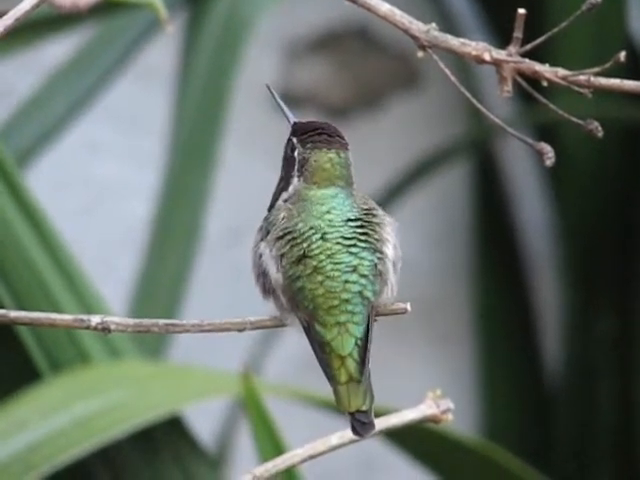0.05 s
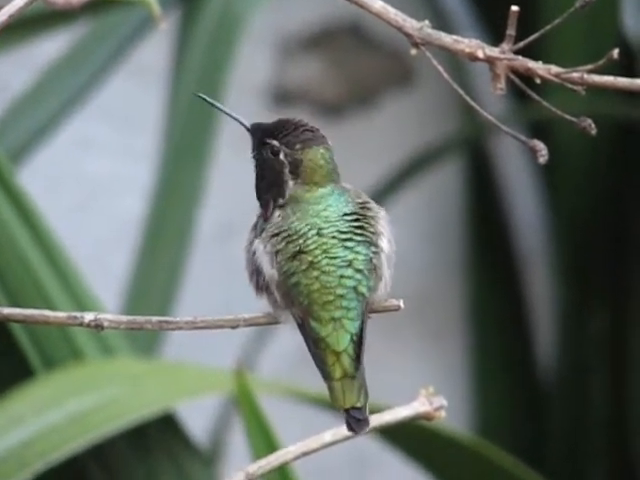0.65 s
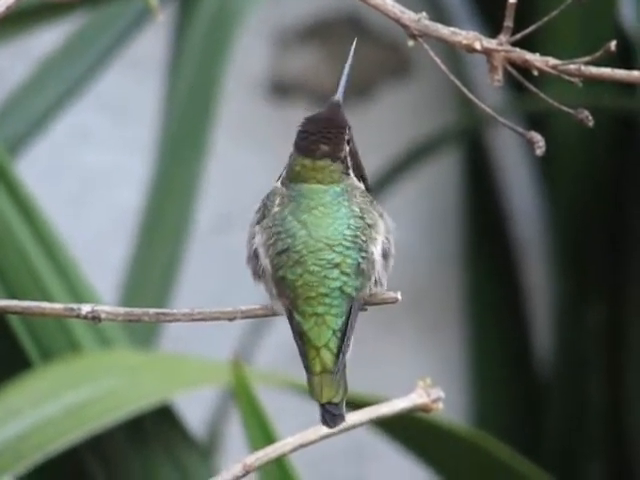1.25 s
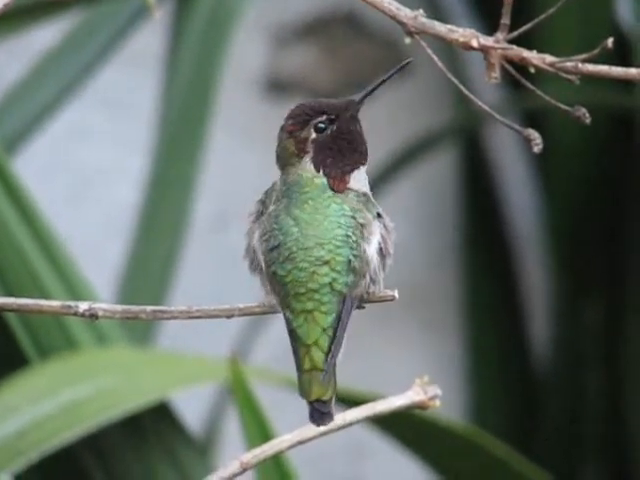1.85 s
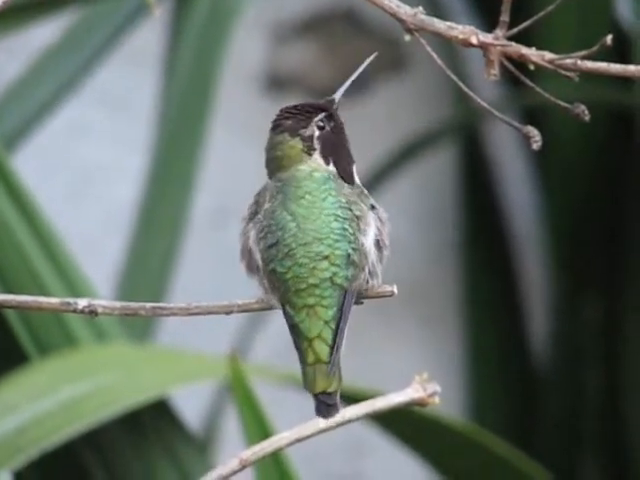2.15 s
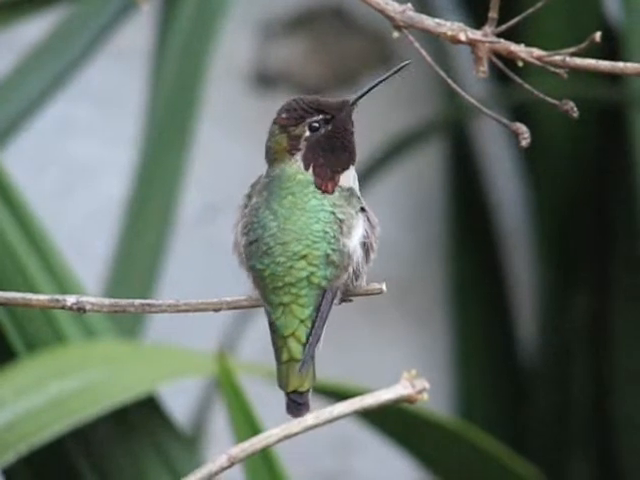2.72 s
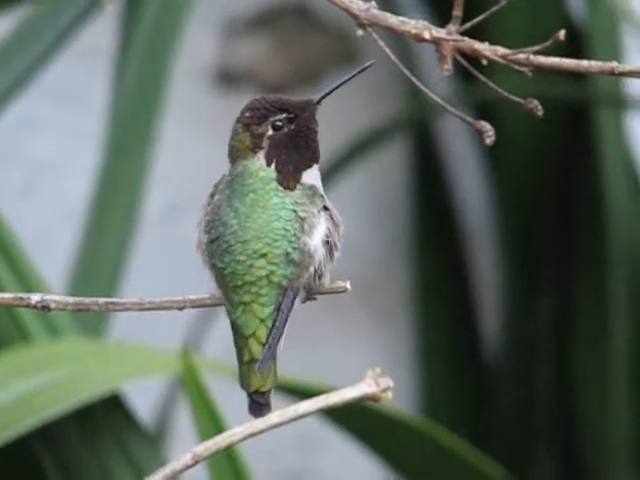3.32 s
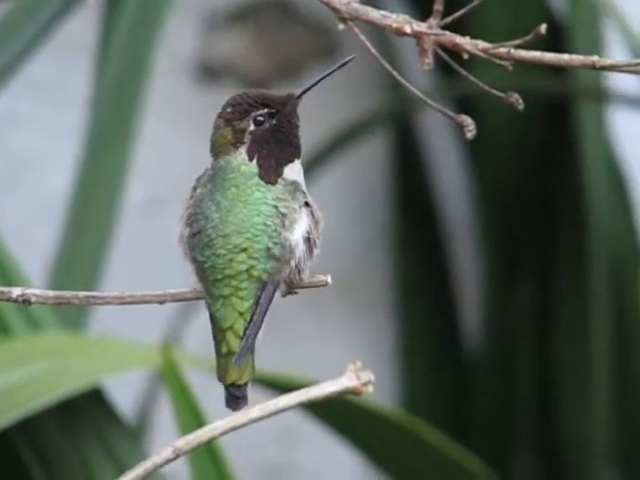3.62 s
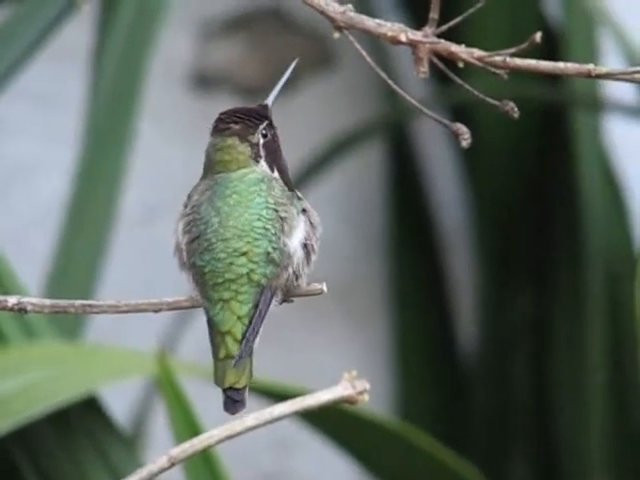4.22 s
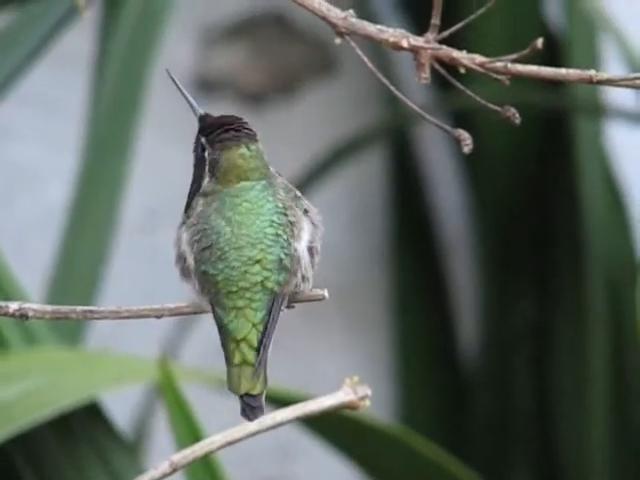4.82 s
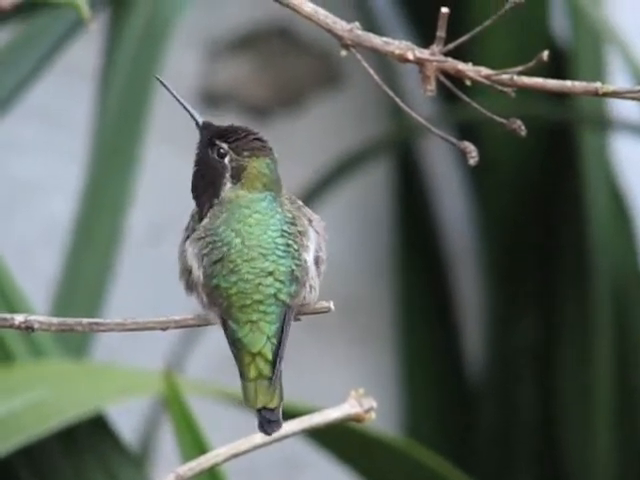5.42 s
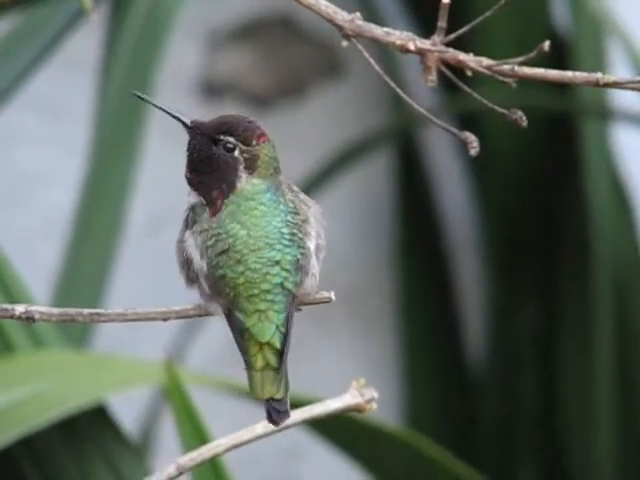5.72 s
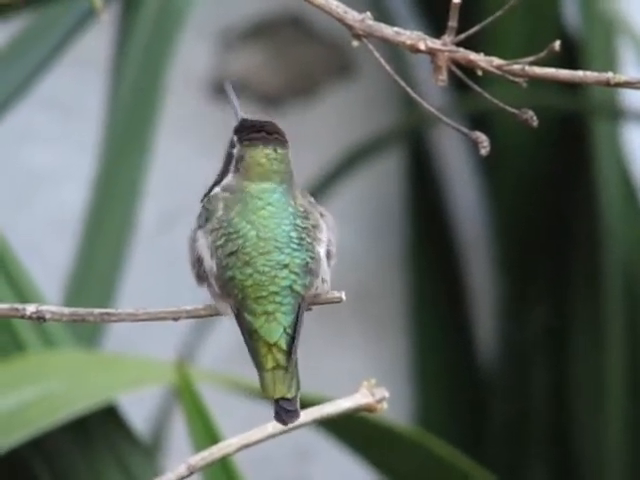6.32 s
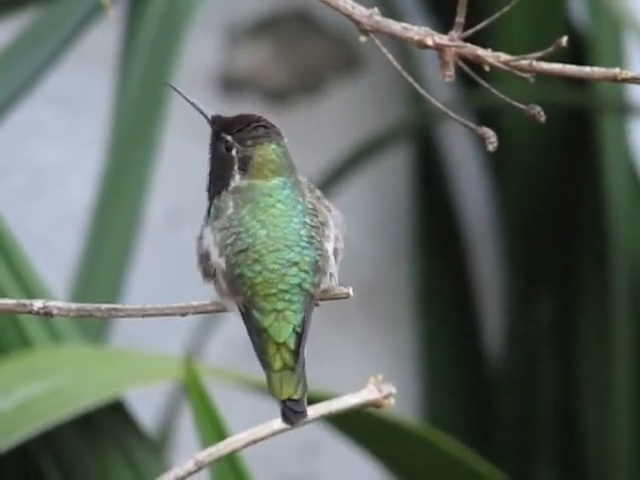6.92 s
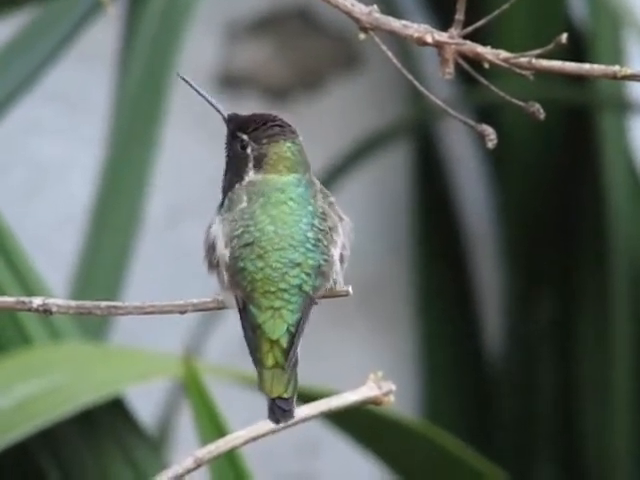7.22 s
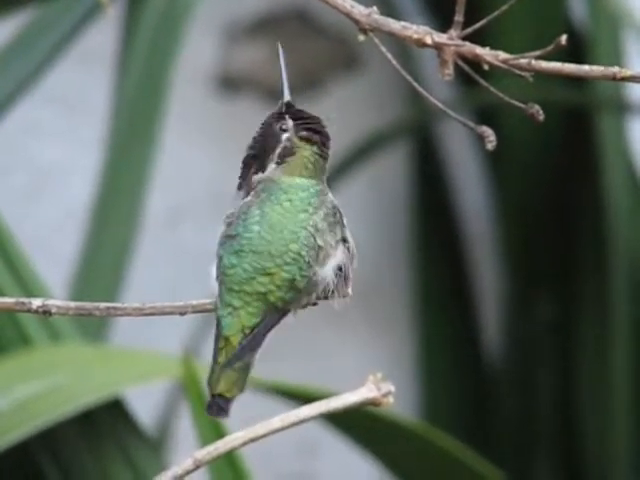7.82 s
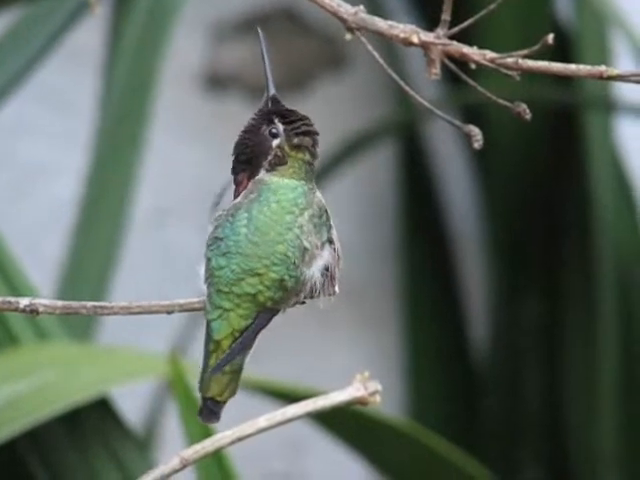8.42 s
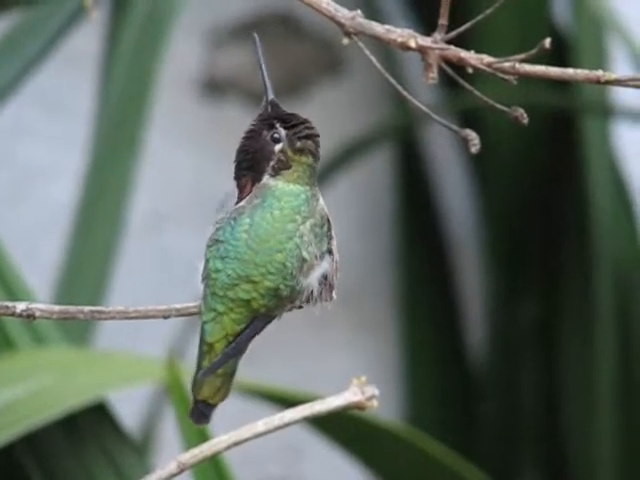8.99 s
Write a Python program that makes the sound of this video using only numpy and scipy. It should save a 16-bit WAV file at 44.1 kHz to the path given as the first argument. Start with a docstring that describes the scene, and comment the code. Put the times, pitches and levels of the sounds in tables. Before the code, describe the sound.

A hummingbird perched in a garden sings a quick run of very high, scratchy chips, about four or five a second, unevenly spaced and sometimes in tight pairs. Each chip drops sharply in pitch and leaves a brief echo from nearby walls and leaves. Behind it are a steady low machine hum, distant town rumble and a faint high whine. The bird, clear and fairly close, stops near the end while the background continues.

```python
"""Hummingbird in a garden

A hummingbird sings a run of high chips, each a thin held whistle whose frequency dives about an
octave in a few milliseconds. Reflection from nearby walls and leaves gives every dive a scratchy
tail. Behind it lie the broadband rumble of a distant town, a machine's low hum and a faint high
whine. A limiter acts on the sum, so loud chips briefly duck the background."""
import sys
import numpy as np
from scipy import signal
from scipy.fft import rfft, irfft
from scipy.io import wavfile
from scipy.ndimage import uniform_filter1d

SR = 44100
rng = np.random.default_rng(int(sys.argv[2]) if len(sys.argv) > 2 else 0)


def master(y):
    """Save y as 16-bit WAV."""
    cut = np.clip(np.atleast_2d(y).T, -1, 1)
    pcm = np.round(cut * 32767)  # scale
    wavfile.write(sys.argv[1], SR, pcm.astype(np.int16))


N = 403515
TIME = np.arange(N) / SR
SONG_TIME = np.arange(-SR // 4, N) / SR   # the song is already under way at time zero
BIN_HZ = np.maximum(np.arange(N // 2 + 1) * SR / N, 1)


def from_db(db):
    """Amplitude ratio: a factor of ten for every 20 dB."""
    return 10 ** (np.asarray(db) / 20)


def gain_at(spectrum, hz):
    """Frequency response: levels interpolated on a log-frequency axis, returned as gain."""
    frequency_hz, level_db = np.transpose(spectrum)
    return from_db(np.interp(np.log(hz), np.log(frequency_hz), level_db))


def colour(x, spectrum):
    """Linear filtering: the sound's spectrum is multiplied by a frequency response."""
    size = x.shape[-1]
    hz = np.maximum(np.arange(size // 2 + 1) * SR / size, 1)
    return irfft(rfft(x) * gain_at(spectrum, hz), size)


# Strength of the fundamental along its dive: pitch_hz, gain_db
FUNDAMENTAL = [(3600, -15), (4300, -12), (5000, -12), (5800, -1.5), (7000, -0.5), (8200, -5.5), (9500, -3),
               (10500, -1.5)]
# Strength of the second harmonic: harmonic_hz, gain_db
SECOND_HARMONIC = [(7500, -27), (9500, -15), (11500, -12), (14000, -27.5), (16000, -59), (20000, -62)]
# Faint high hiss that accompanies each whistle, relative to it: frequency_hz, gain_db
WHISTLE_HISS = [(4000, -33), (7000, -24), (10500, -16), (12000, -23.5), (15000, -39.5)]
# One chip quavers on its way down and stops higher: time_s, depth_hz, rate_hz, lowest_hz
QUAVER = (6.091, 600, 300, 5100)
DIVE_HZ, DIVE_HZ_PER_S = 7000, 740000


def chip(t, top_hz, hold_s, hold_db, treble_db, quavers, curve=2.2, scoop_hz=300, jitter_hz=70,
         lowest_hz=4320, fade_hz=450, attack_s=0.0048, swell_db=5, peak_lead_s=0.0026):
    """Frequency modulation: a whistle scoops up, holds, then dives through DIVE_HZ at t = 0."""
    bend_s = curve * (top_hz - DIVE_HZ) / DIVE_HZ_PER_S   # a higher chip takes longer to bend over
    lead_s = hold_s + bend_s
    descent = np.clip(1 + t / bend_s, 0, 1) ** curve + curve * np.maximum(t, 0) / bend_s
    scoop = np.clip((-t - bend_s) / bend_s, 0, 1) ** 2
    jitter = uniform_filter1d(rng.standard_normal(len(t)), size=50)
    hz = top_hz - (top_hz - DIVE_HZ) * descent - scoop_hz * scoop + jitter_hz * jitter / np.std(jitter)
    if quavers:
        _, depth_hz, rate_hz, lowest_hz = QUAVER
        # the wobble is strongest in mid-dive, and the fall after it is slower
        wobble = -np.sin(np.pi / 2 * np.minimum(descent, 2)) ** .5 * np.cos(2 * np.pi * rate_hz * t)
        hz = hz + depth_hz * (wobble + np.maximum(descent - 1, 0))
    hz = np.maximum(hz, lowest_hz - fade_hz)
    onset = np.clip((t + lead_s) / attack_s, 0, 1)
    fade = np.clip((hz - lowest_hz + fade_hz) / (2 * fade_hz), 0, 1)
    # air pressure builds through the hold and is full in the dive
    to_peak = np.clip((-t - peak_lead_s) / max(lead_s - peak_lead_s, .001), 0, 1)
    pressure = onset * fade * from_db(hold_db * np.sqrt(to_peak) - swell_db * to_peak ** 2)
    phase = 2 * np.pi * np.cumsum(hz) / SR
    strength = gain_at(FUNDAMENTAL, hz)
    octave = gain_at(SECOND_HARMONIC, 2 * hz) * np.sin(2 * phase)
    hiss = strength * colour(rng.standard_normal(len(t)), WHISTLE_HISS)
    return np.sqrt(2) * pressure * (strength * np.sin(phase) + from_db(treble_db) * (octave + hiss))


# The chips of the song: mid_dive_s, held_pitch_hz, gain_db, hold_gain_db
CHIPS = [(-0.062, 8930, -14.5, -11), (0.261, 9210, -9, -7.5), (0.5086, 9400, -9.5, -8),
         (0.817, 9500, -8, -10.5), (1.2743, 10330, -9.5, -4.6), (1.3912, 9670, -9.5, -1),
         (1.63, 10110, -9, -4.1), (1.7224, 10000, -9, -4.5), (1.9003, 10180, -9.5, -7.5),
         (1.9806, 9800, -6.9, -10.5), (2.238, 9820, -8.5, -10), (2.3187, 9560, -7.8, -8),
         (2.5803, 9790, -9, -10.5), (2.675, 9390, -7.1, -6.5), (2.8762, 9550, -6.5, -8),
         (3.014, 9540, -6, -8.5), (3.1944, 9900, -7.5, -11.5), (3.458, 9600, -8.5, -7),
         (3.5753, 9540, -7.6, -5.5), (3.7996, 9730, -7, -10.5), (3.9574, 9590, -7, -7.5),
         (4.1985, 9600, -8, -5), (4.4374, 9600, -8, -5.5), (4.6341, 9630, -7, -7.5),
         (4.7814, 9480, -7.5, -6), (5.0237, 9400, -7, -4.8), (5.198, 9810, -9, -6),
         (5.4224, 9520, -9, -3.5), (5.632, 9750, -9.5, -3.5), (5.84, 9460, -8.6, -3.5),
         (6.0909, 9300, -8.5, -8), (6.322, 9960, -10, -6.5), (6.5582, 9630, -10, -4.5),
         (6.822, 9500, -9.5, -6.0), (7.0143, 9790, -8, -11), (7.265, 9530, -8, -9.5),
         (7.481, 9600, -9.0, -5.7), (7.7512, 9250, -9, -6)]
# Strength of second harmonic and hiss along the song: time_s, gain_db
TREBLE = [(0.3, 1), (1.6, -2), (2.5, 0), (3.3, 1), (4.8, -1.5), (7.7, 0)]
DIVE_TIMES_S = np.array(CHIPS)[:, 0]


def hummingbird(gain_db=0.35, single_hold_s=0.0065, pair_extra_s=0.002, pair_gap_s=0.16):
    """Superposition of chips into a song; those in a quick pair hold their pitch longer."""
    song = np.zeros(len(SONG_TIME))
    for dive_s, top_hz, chip_db, hold_db in CHIPS:
        span = slice(*np.searchsorted(SONG_TIME, [dive_s - .02, dive_s + .01]))
        quavers = abs(dive_s - QUAVER[0]) < .05
        paired = np.sum(abs(DIVE_TIMES_S - dive_s) < pair_gap_s) > 1
        hold_s = single_hold_s + pair_extra_s * paired
        treble_db = np.interp(dive_s, *np.transpose(TREBLE))
        whistle = chip(SONG_TIME[span] - dive_s, top_hz, hold_s, hold_db, treble_db, quavers)
        song[span] += from_db(chip_db + gain_db) * whistle
    return song


# Distinct reflections from nearby surfaces: delay_s, gain_db
REFLECTIONS = [(.0007, -9), (.0046, -6.5), (.0084, -25), (0.0144, -14), (0.0173, -11.5)]
# Spectrum of the scattered sound: frequency_hz, gain_db
SCATTER = [(4000, 3), (6000, 3.5), (8000, 3.5), (9600, 3.5), (11000, 3), (13000, 4.5), (15000, -4.5)]
# Filter on the left-right difference of all echoes: frequency_hz, gain_db
ECHO_SIDE = [(4000, -30), (6300, -5.5), (7300, -8), (8400, -28), (9600, -6.5), (11000, -19), (13000, -29)]


def garden_echoes(song, leaves_db=-6, leaves_t60_s=0.15, walls_db=-6.5, walls_t60_s=0.35,
                  gap_s=0.0012, absorption_hz=8400, absorption_db_per_s=45):
    """Multipath propagation: direct sound, reflections and diffuse decay, as mid and side."""
    t = TIME[:SR // 2]
    power = 0
    for level_db, t60_s in (leaves_db, leaves_t60_s), (walls_db, walls_t60_s):
        decay = from_db(-60 * t / t60_s) ** 2 * np.clip(t / gap_s - 1, 0, 1)
        power = power + from_db(level_db) ** 2 * decay / decay.sum()
    # the bird turns its head, so each chip takes one of five sets of paths
    chip_headings = rng.integers(0, 5, len(CHIPS) + 1)
    heading = chip_headings[np.searchsorted(DIVE_TIMES_S - .025, SONG_TIME)]
    lowpass = signal.butter(2, absorption_hz, fs=SR, output="sos")
    side_fade = np.minimum(2 - 2 * t / t[-1], 1)
    mid_side = np.zeros((2, N))
    for direction in np.unique(heading):
        scatter = colour(rng.standard_normal((2, len(t))), SCATTER)
        dull = signal.sosfiltfilt(lowpass, scatter)
        treble = (scatter - dull) * from_db(-absorption_db_per_s * t)   # air absorbs it along the way
        paths = np.sqrt(power) * (dull + treble)
        for delay_s, gain_db in REFLECTIONS:
            arrival = round(abs(delay_s + rng.normal(0, .0001)) * SR)
            paths[:, arrival] += from_db(gain_db) * np.array([1, rng.choice([-1, 1])])   # left or right
        paths[0, 0] += 1   # direct sound
        paths[1] = colour(paths[1], ECHO_SIDE) * side_fade
        heard = signal.oaconvolve([song * (heading == direction)], paths, axes=1)
        mid_side += heard[:, len(song) - N:len(song)]
    return mid_side


def port_resonance(x, centre_hz=6510, width_hz=3400, peak_gain=0.64):
    """Resonance between two microphone ports: two like second-order band-passes in cascade."""
    radius = np.exp(-np.pi * width_hz / SR)
    gain = (1 - radius ** 2) / 2
    section = [gain, 0, -gain, 1, -2 * radius * np.cos(2 * np.pi * centre_hz / SR), radius ** 2]
    return peak_gain * signal.sosfilt([section, section], x)


# Town noise common to both channels: frequency_hz, density_db
TOWN_MID = [(12, -64), (24, -52.5), (46, -48.5), (56, -64.5), (72, -54), (180, -56), (300, -62.5),
            (600, -68.5), (820, -74.5), (1100, -73.5), (1800, -78.5), (3200, -87), (5800, -87),
            (7500, -96.5), (12000, -102), (14000, -122)]
# Town noise differing between the channels: frequency_hz, density_db
TOWN_SIDE = [(20, -72), (150, -77.5), (400, -84), (1000, -83.5), (3000, -90), (6100, -92), (7500, -99),
             (11500, -105), (13500, -125)]
# Slow swells of the town: time_s, rumble_gain_db, rush_gain_db
TOWN_SWELLS = [(0.0, 0.8, 0.1), (0.7, 0.7, 0.1), (1.1, 0.5, 1.8), (1.45, -3, -1.3), (2.2, 0.3, -0.9),
               (3.1, -0.7, 1.3), (3.55, -0.5, 1.2), (3.9, 1, 1.9), (4.6, 1.5, 1.6), (5.25, 0.5, 0.8),
               (5.65, -1.5, -1.1), (6.6, -1.5, -2.2), (7.1, 0, -0.2), (8.1, 0.5, -1), (9.15, -1, -0.6)]


def town(split_hz=450):
    """Amplitude-modulated noise: far traffic's rumble and rush swell separately, as mid and side."""
    time_s, *gains_db = np.transpose(TOWN_SWELLS)
    rumble_gain, rush_gain = [from_db(np.interp(TIME, time_s, db)) for db in gains_db]
    white = rng.standard_normal((2, N)) * np.sqrt(SR / 2)   # unit power per hertz
    traffic = colour(white[0], TOWN_MID)
    rumble = irfft(rfft(traffic) / (1 + (BIN_HZ / split_hz) ** 4), N)
    mid = rumble * rumble_gain + (traffic - rumble) * rush_gain
    side = colour(white[1], TOWN_SIDE) * rush_gain
    return np.array([mid, side])


def wavering_tone(hz, width_hz):
    """Narrowband noise: a tone of unit rms whose amplitude and phase wander."""
    line = irfft(rfft(rng.standard_normal(N)) / (1 + ((BIN_HZ - hz) / width_hz) ** 2), N)
    return line / np.std(line)


# Spectral lines of the machine: pitch_hz, level_db, flutter_width_hz
HUM_LINES = [(119.4, -35, 6.4), (207.2, -49.5, 2.9), (249.2, -44, 4), (332.6, -48.5, 3.3),
             (437, -61.5, 2.7)]


def machine_hum(steady_share=0.7):
    """Line spectrum of a distant machine: each line's power is part steady tone, part flutter."""
    hum = 0
    for pitch_hz, level_db, width_hz in HUM_LINES:
        tone = np.sqrt(2 * steady_share) * np.sin(2 * np.pi * (pitch_hz * TIME + rng.random()))
        flutter = np.sqrt(1 - steady_share) * wavering_tone(pitch_hz, width_hz)
        hum = hum + from_db(level_db) * (tone + flutter)
    return hum


# Narrow bands of the high whine: centre_hz, level_db, width_hz
WHINE_BANDS = [(4510, -53, 48), (6035, -73, 20), (8000, -75, 15)]


def whine(side_db=-5):
    """Decorrelation: independent noise bands in mid and side give the whine no clear direction."""
    mid_side = np.zeros((2, N))
    for centre_hz, level_db, width_hz in WHINE_BANDS:
        mid_side[0] += from_db(level_db) * wavering_tone(centre_hz, width_hz)
        mid_side[1] += from_db(level_db + side_db) * wavering_tone(centre_hz, width_hz)
    return mid_side


def limiter(x, threshold_db=-5.0, attack_s=0.00028, release_s=0.064):
    """Peak limiting: excess level pulls the gain down fast, and the reduction decays exponentially."""
    peak_db = 20 * np.log10(np.abs(x).max(axis=0) + 1e-9)
    excess_db = np.maximum(peak_db - threshold_db, 1e-9)
    release = TIME / release_s
    held_db = np.exp(np.maximum.accumulate(np.log(excess_db) + release) - release)
    pole = np.exp(-1 / (attack_s * SR))
    reduction_db = signal.lfilter([1 - pole], [1, -pole], held_db)
    return x * from_db(-reduction_db)


def scene(pan_db=0.42):
    """Mid-side stereo of bird and background: left is their sum, right is mid minus side."""
    bird_mid, bird_side = garden_echoes(hummingbird())
    # the resonance lifts the left and hollows the right as each dive passes it
    bird_side = bird_side + port_resonance(bird_mid)
    back_mid, back_side = town() + whine()
    background = (back_mid + machine_hum()) * from_db([[pan_db], [-pan_db]])
    return bird_mid + background + (bird_side + back_side) * np.array([[1], [-1]])


def record(dry, cutoff_hz=15900):
    """Band limiting: a steep low-pass filter follows the limiter."""
    lowpass = signal.cheby2(14, 40, cutoff_hz, fs=SR, output="sos")
    return signal.sosfiltfilt(lowpass, limiter(dry))


dry = scene()
out = record(dry)
master(out)
```